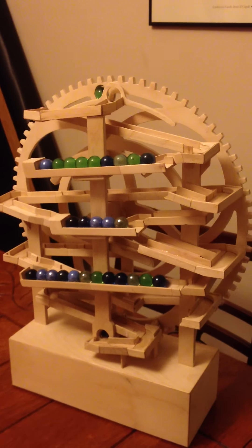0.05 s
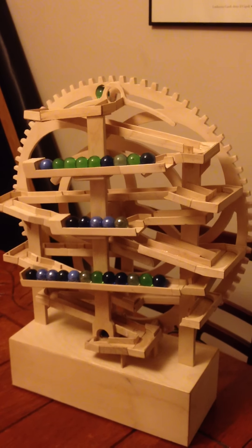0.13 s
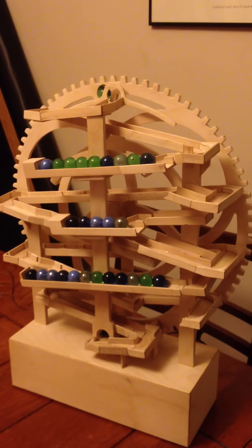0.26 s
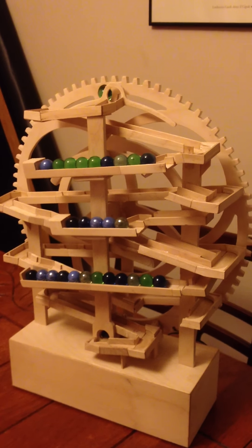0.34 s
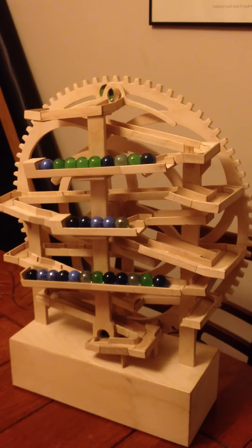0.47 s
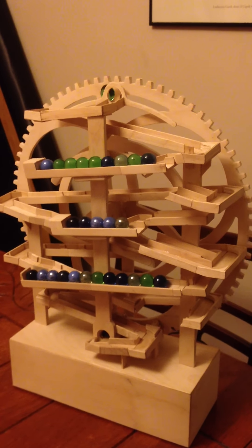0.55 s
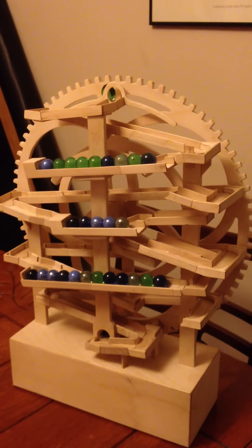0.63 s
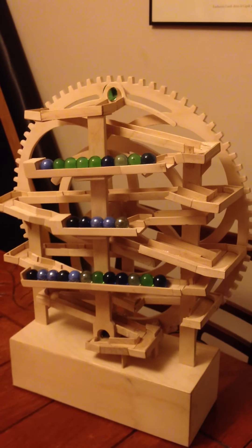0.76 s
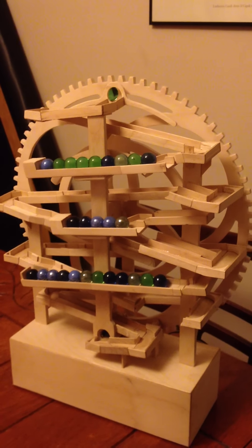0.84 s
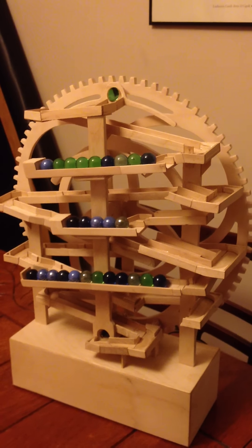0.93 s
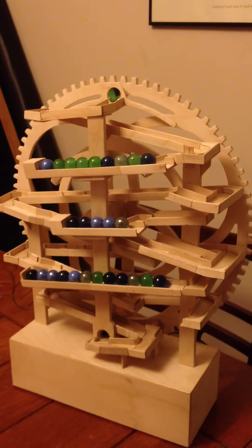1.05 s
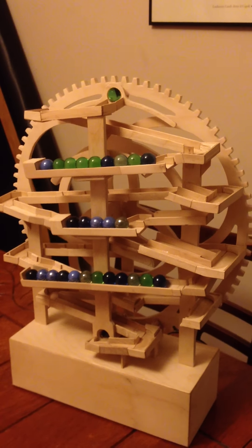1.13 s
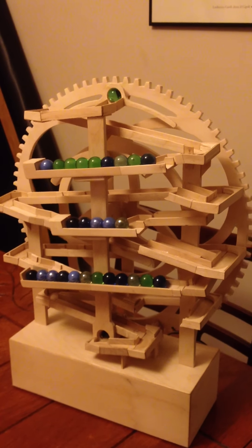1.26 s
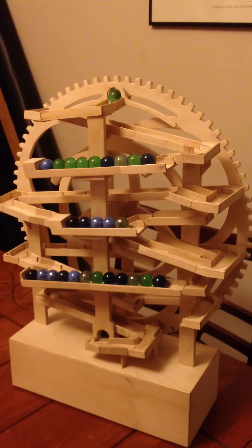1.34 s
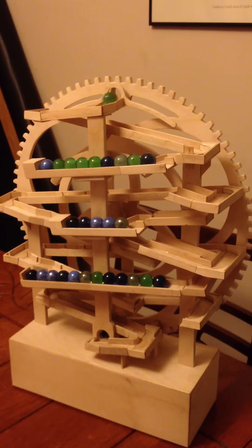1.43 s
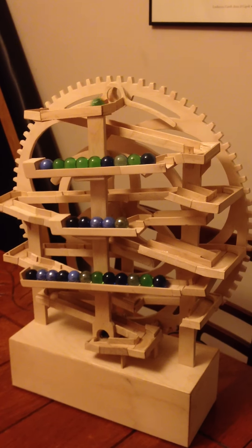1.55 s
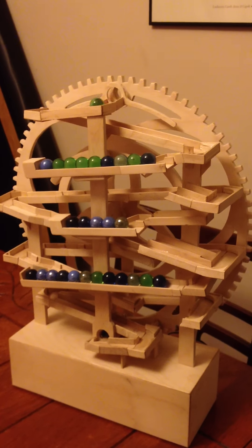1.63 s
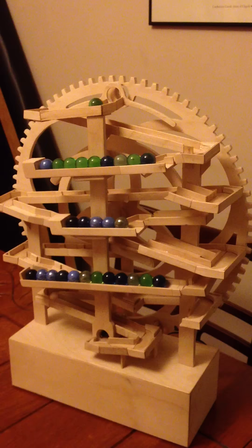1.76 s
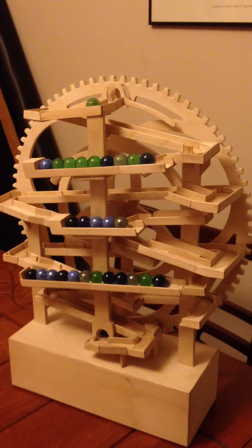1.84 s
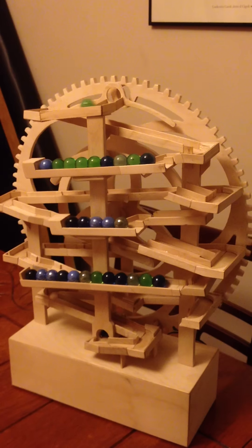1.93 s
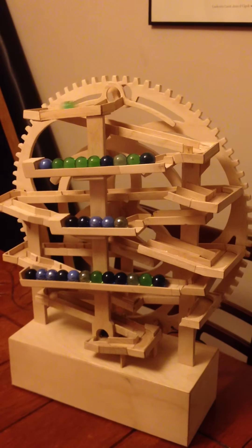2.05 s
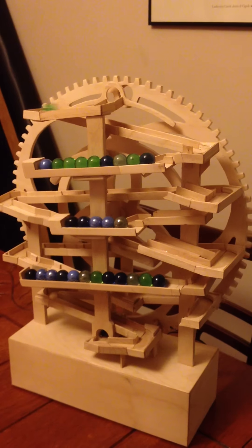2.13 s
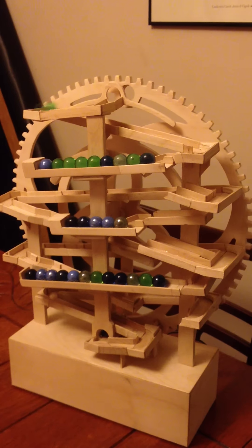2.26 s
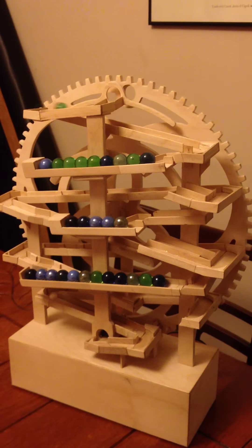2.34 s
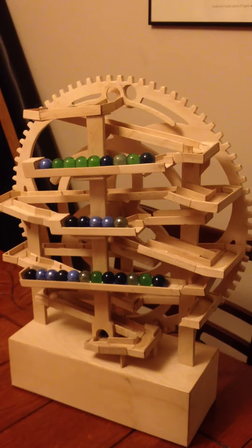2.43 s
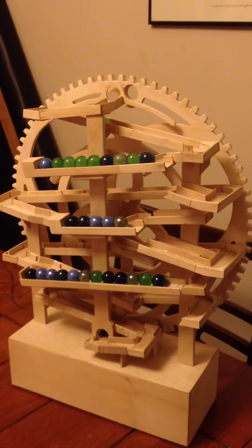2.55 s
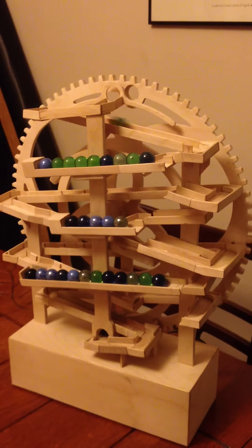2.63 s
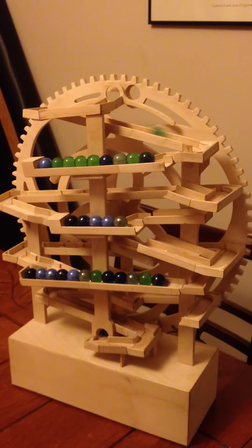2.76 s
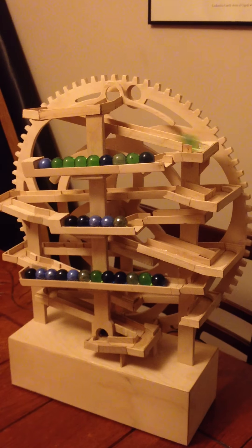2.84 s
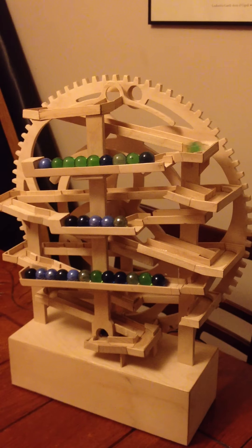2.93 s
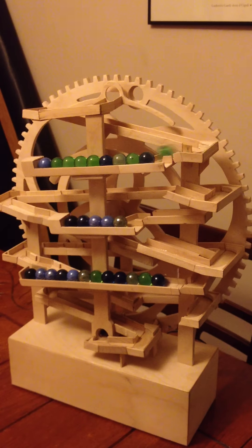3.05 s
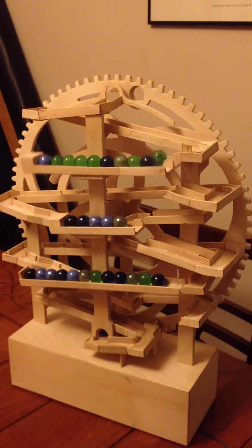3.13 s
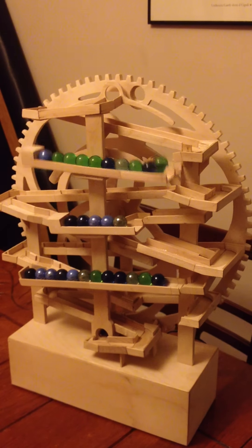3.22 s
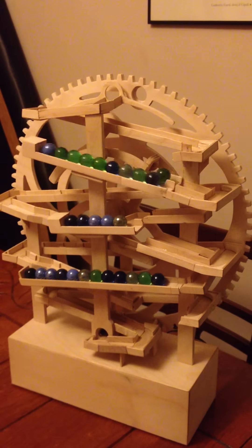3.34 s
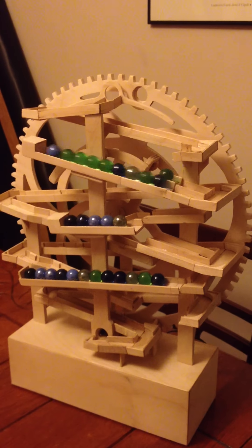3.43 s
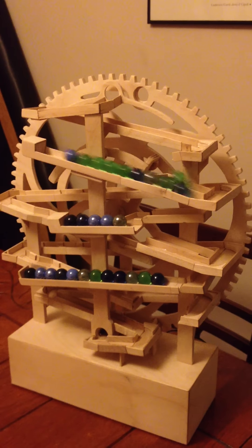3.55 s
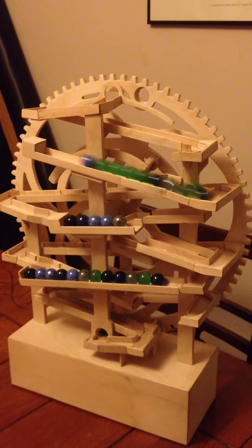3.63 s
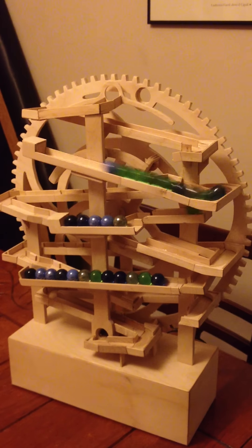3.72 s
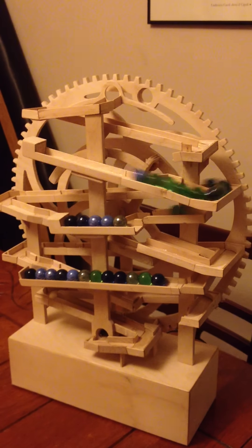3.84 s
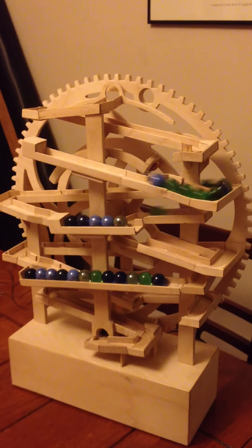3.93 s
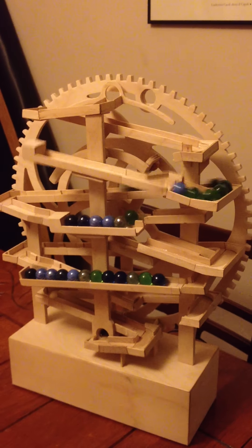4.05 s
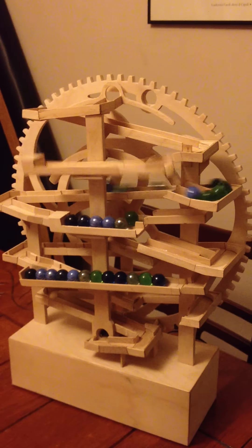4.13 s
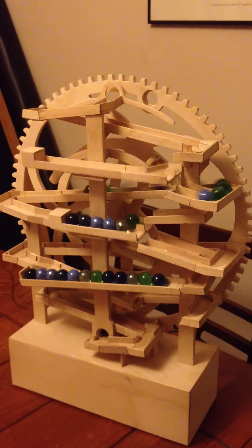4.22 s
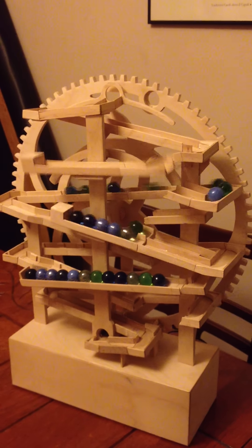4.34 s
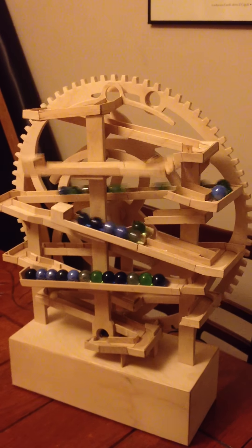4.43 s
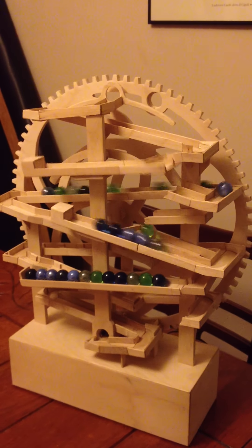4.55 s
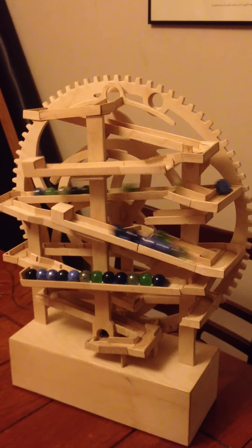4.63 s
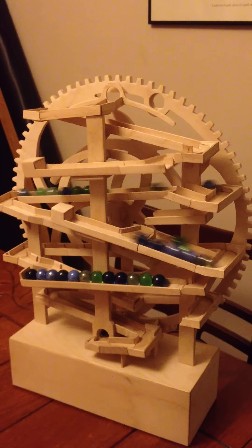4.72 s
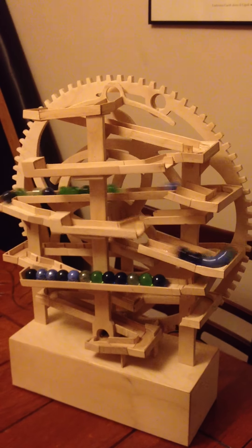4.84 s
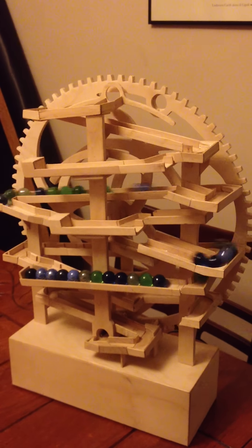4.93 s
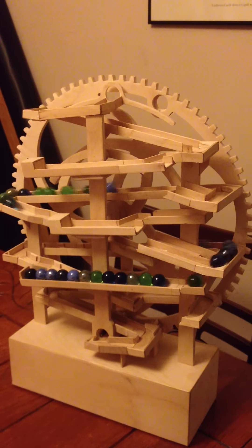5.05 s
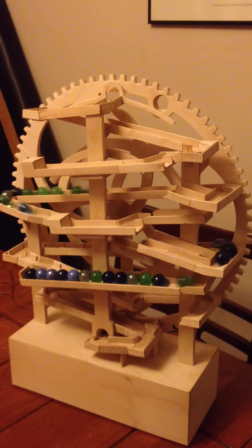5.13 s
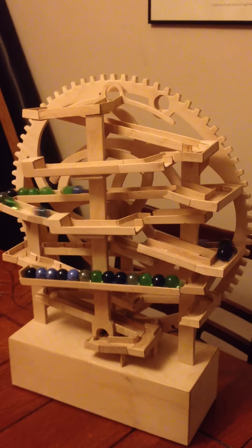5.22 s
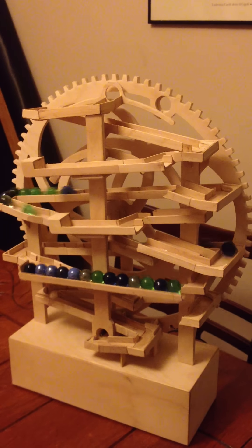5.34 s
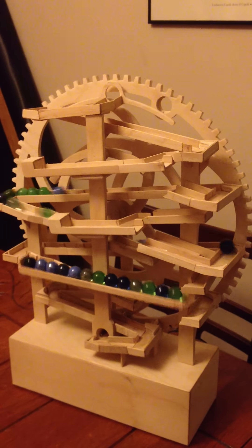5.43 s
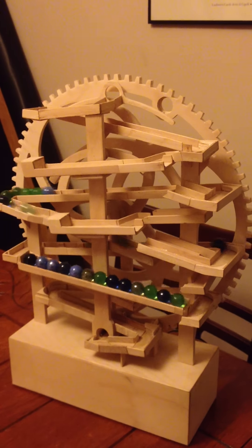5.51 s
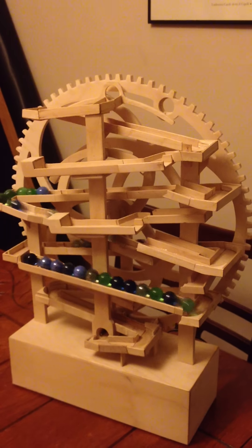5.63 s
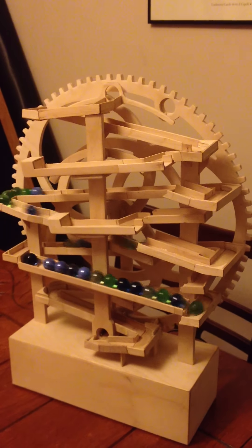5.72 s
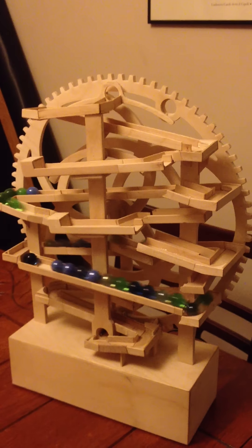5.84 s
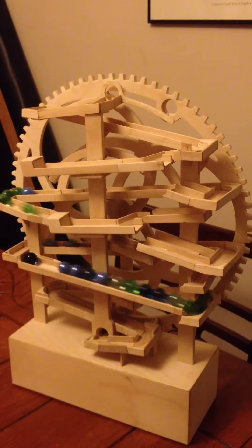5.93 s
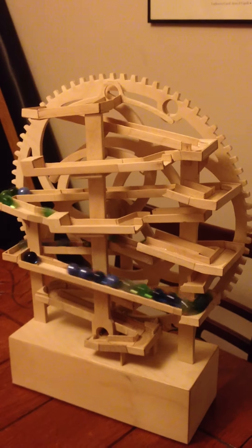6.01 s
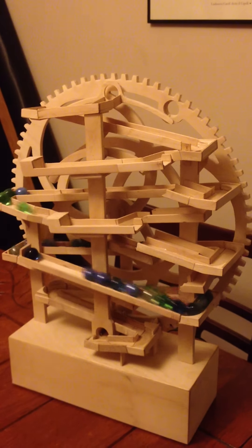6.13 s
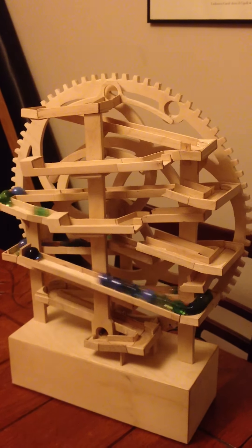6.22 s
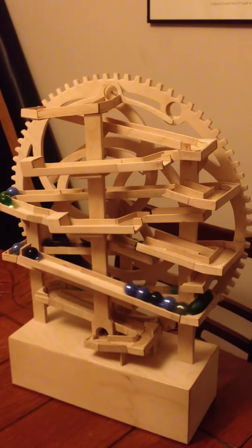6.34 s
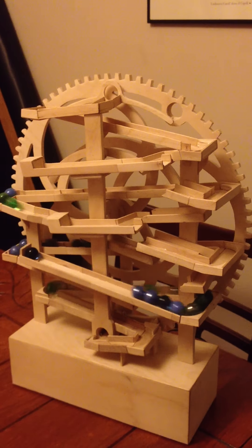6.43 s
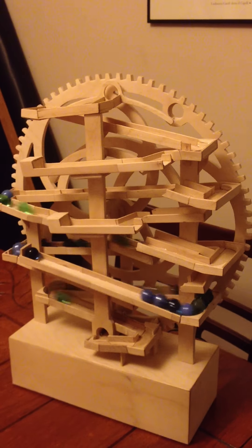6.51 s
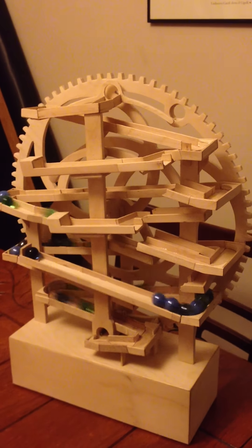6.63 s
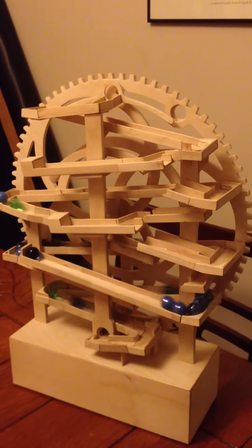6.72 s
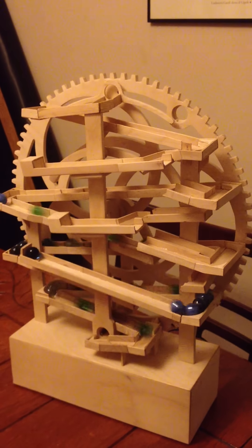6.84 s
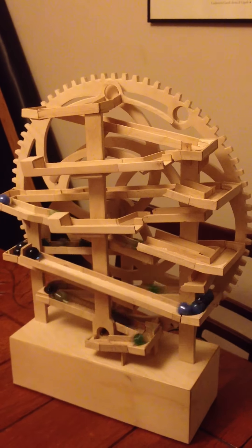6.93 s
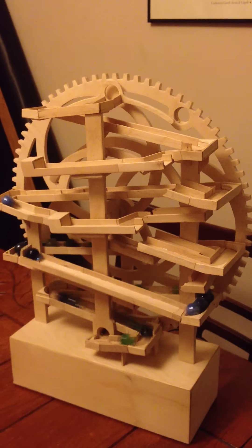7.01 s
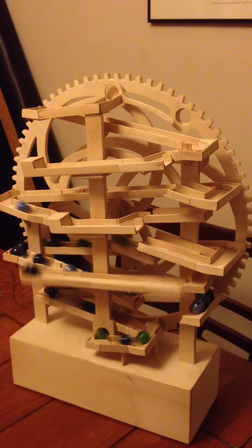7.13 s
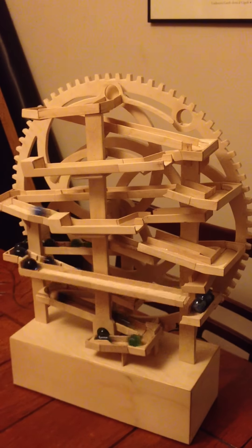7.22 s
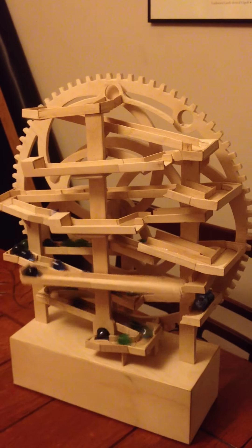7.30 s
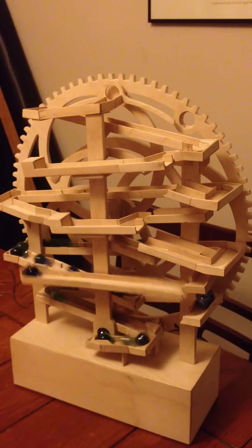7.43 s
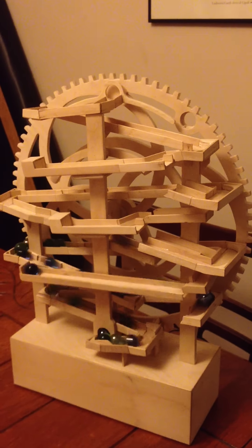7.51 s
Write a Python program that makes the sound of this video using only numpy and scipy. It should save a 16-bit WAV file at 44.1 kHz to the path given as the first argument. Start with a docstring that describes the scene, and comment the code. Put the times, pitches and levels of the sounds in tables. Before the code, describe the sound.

A close microphone in a small, fairly live room hears a soft steady hush. Around 0.8 to 1.3 seconds a wooden gear gives faint creaks, short trains of dull low pulses. From 1.3 a single glass marble stirs, with tiny taps and a clearer woody knock at 1.6, then a brief near-silence. It rolls again from about 2.05, clicking at 2.2 to 2.35 and 2.6 to 2.7, with sharper clacks near 3.0, 3.15 and 3.4. At 3.6 the trays tip and the sound swells abruptly, with very hard clacks around 3.7. A crowd of marbles then rumbles down hollow wooden tracks, jostling, cracking against thin rails and clinking brightly, with dull thuds in the frame and hollow base. Successive trayfuls surge and overlap, heavier thuds gathering after 6 seconds. The dense rattle continues to the end at about 7.5 seconds, without dying away.

```python
"""A wooden marble machine in a small, fairly live room, over a steady hush of filtered noise.
First the gear creaks in trains of dull pulses. Then a glass marble rolls and knocks down the tracks:
noise bursts for the cracks, damped sines for the wood's pitch, streams of tiny bumps for the rolling.
From 3.6 s the trays tip, and a crowd of marbles rumbles, clacks on wood and clinks brightly,
with random contacts for the jostling, until the end."""
import sys
import numpy as np
from scipy import signal
from scipy.fft import rfft, irfft
from scipy.io import wavfile

SR = 44100
rng = np.random.default_rng(int(sys.argv[2]) if len(sys.argv) > 2 else 0)


def wrap_up_sound(samples):
    """Save the sound to the file named by the first command line argument, as 16-bit audio."""
    columns = np.atleast_2d(samples).T
    # keep every value between -1 and 1, then stretch to whole-number steps
    tamed = np.clip(columns, -1, 1)
    steps = np.round(tamed * 32767).astype(np.int16)
    wavfile.write(sys.argv[1], SR, steps)


N = 333837
TIME = np.arange(N) / SR

# All levels in the tables are relative: each layer adds its own mix gain.

# A marble strikes a track end or drops onto a tray. Each row: time in seconds, clack level in dB,
# pitch of the wood in Hz, level of the thud in the frame in dB, hop until it lands again in seconds.
KNOCKS = [(1.3117, -57.5, 2890, -64, 0.0022), (1.3946, -58, 980, -66, 0.0034),
          (1.4437, -52, 1340, -63, 0.0062), (1.4616, -37.5, 1240, -52, 0.0043),
          (1.5951, -46, 1110, -55, 0.0054), (1.6153, -22.5, 1090, -37.5, 0.013),
          (1.6458, -26, 2480, -38, 0.015), (1.6719, -43, 2310, -41, 0.0082),
          (1.735, -31.5, 1450, -43.5, 0.0098), (2.152, -46.5, 1130, -72, 0.05),
          (2.2348, -33.5, 1640, -47.5, 0.0055), (2.2942, -26.5, 2810, -37.5, .0184),
          (2.3482, -35.5, 2820, -62, 0.0088), (2.6054, -49, 2470, -53, .012),
          (2.67, -40.5, 2480, -47, 0.0045), (2.6971, -32.5, 2780, -56, 0.0061),
          (2.9302, -21.5, 2650, -37, 0.0043), (2.9665, -35, 2510, -34, .01),
          (2.9914, -18, 2140, -38, 0.013), (3.1033, -32.5, 2520, -40, .012),
          (3.1331, -21.5, 2300, -41.5, 0.011), (3.1663, -29.5, 2630, -41, .005),
          (3.1922, -28, 3000, -47, .008), (3.3782, -29.5, 2580, -39, 0.0092),
          (3.3999, -21.5, 2890, -36, 0.011), (3.5924, -20.5, 3020, -46, .0235),
          (3.6509, -13.5, 2250, -33, 0.015), (3.692, -22.5, 2860, -42, 0.0083),
          (3.719, -12, 2850, -41, 0.0025), (3.761, -9, 2230, -28.5, 0.0018),
          (3.827, -19.5, 3020, -40, 0.0062), (3.9465, -20, 2650, -39, 0.0089),
          (4.0193, -23, 2700, -54, .003), (4.0982, -16.5, 2990, -52, .002),
          (4.2158, -18.5, 2680, -34.5, .013), (4.2704, -23, 2860, -40, 0.0045),
          (4.339, -22, 2440, -44, 0.0059), (4.3854, -17, 2620, -37, .016),
          (4.4515, -17.5, 2660, -50, 0.0035), (4.5285, -15, 2660, -32, 0.021),
          (4.636, -17.5, 2520, -37, .01), (4.6865, -12, 3080, -43, 0.01), (4.7598, -18, 2740, -40, .009),
          (4.885, -12, 1940, -32, .016), (4.9335, -10.5, 2960, -28.5, 0.0084), (5, -19, 2670, -37, 0.0076),
          (5.0591, -15.5, 2200, -34.5, .01), (5.135, -13.5, 2400, -35, 0.0039),
          (5.1681, -18.5, 2140, -30, 0.029), (5.242, -15, 2530, -37, 0.0076),
          (5.275, -26, 2660, -30.5, 0.013), (5.4156, -17.5, 2580, -29.5, .022),
          (5.5672, -15, 3020, -28, 0.0077), (5.5884, -16.5, 2540, -30.5, 0.0055),
          (5.631, -16, 2230, -29.5, 0.0097), (5.813, -16, 2400, -40, .01),
          (5.831, -14.5, 2270, -28.5, .012), (5.985, -10.5, 2200, -25, 0.012),
          (6.16, -12.5, 2150, -30.5, 0.0025), (6.2, -21, 2600, -30.5, 0.0059),
          (6.3915, -12, 2040, -32, 0.0082), (6.4711, -16.5, 2800, -30.5, 0.0087),
          (6.5127, -15.5, 2670, -39, .003), (6.5323, -12, 1750, -33, 0.0075),
          (6.6169, -10.5, 1800, -31, 0.016), (6.66, -11, 2600, -29.5, 0.018),
          (6.744, -12.5, 2330, -29, 0.0064), (6.8791, -15, 2100, -32.5, 0.0065),
          (6.9266, -15, 2750, -25.5, .008), (6.9678, -15, 2160, -38, 0.0063),
          (7.01, -13, 2170, -26, 0.0069), (7.1043, -13.5, 2890, -28.5, 0.0087),
          (7.1588, -13.5, 2230, -26.5, 0.007), (7.1972, -12, 2880, -31.5, 0.0072),
          (7.2533, -11.5, 2180, -27.5, 0.0071), (7.3, -13.5, 1670, -31, 0.0034),
          (7.3553, -13, 2610, -40, 0.018), (7.4178, -15.5, 2240, -27, 0.0052),
          (7.5478, -13.5, 2770, -29, 0.0037)]
# Bright glassy clinks, alone or on top of a wooden knock. Each row: time in seconds, level in dB.
CLINKS = [(1.6459, -47), (2.6975, -47.5), (3.1661, -38.5), (3.6512, -34), (3.762, -23), (4.1587, -33),
          (4.228, -28.5), (4.3059, -28.5), (4.339, -31), (4.3847, -30.5), (4.5051, -31.5), (4.5477, -33),
          (4.636, -28), (4.6862, -43), (4.7601, -29), (4.816, -33), (4.9006, -40), (4.9336, -27.5),
          (5.1934, -30.5), (5.276, -28), (5.437, -32.5), (5.5881, -28.5), (5.6313, -31), (5.757, -36),
          (5.8124, -27), (5.9848, -35), (6.199, -28), (6.276, -31.5), (6.3894, -29.5), (6.5323, -35),
          (6.8562, -30), (7.01, -31), (7.1036, -31.5), (7.4597, -33), (7.5342, -29)]
# How hard the crowd of marbles jostles once the trays tip. Each row: time in seconds, level in dB.
JOSTLE = [(3.6, -44), (3.66, -41), (3.76, -34), (3.82, -28.5), (4.15, -36.5), (4.43, -35.5), (4.62, -33.5),
          (4.88, -28.5), (5.1, -30.5), (5.25, -30.5), (5.38, -33.5), (5.78, -35), (6.33, -34), (6.63, -30),
          (6.95, -34), (7.15, -30), (7.57, -31.5)]
# A marble or a trayful runs down a track. Each row: start in seconds, end in seconds,
# level at full speed in dB, lean from the low to the high track note in dB.
RUNS = [(1.342, 1.503, -61, -13), (1.546, 1.746, -55, -12), (2.054, 2.367, -50.5, -9.5),
        (2.43, 2.727, -53, -3), (2.6, 2.895, -56.5, -14.5), (2.893, 3.012, -42.5, -15.5),
        (3.346, 3.433, -50, -4), (3.503, 3.786, -43, -6), (3.6, 4.144, -40, -2), (4.044, 4.424, -36, 2.5),
        (4.248, 4.977, -36, -3.5), (5.0, 5.298, -39, 7.5), (5.197, 5.848, -38.5, 2.5),
        (5.496, 6.415, -36.5, -0.5), (6.05, 6.75, -37, 6.5), (6.598, 7.037, -34, 3.5),
        (6.848, 7.452, -37.5, 13.5)]
# The gear sticks and slips on its axle. Each row: start in seconds, length in seconds,
# level at the middle of the creak in dB.
CREAKS = [(0.828, 0.084, -47), (0.957, .05, -53), (1.069, .004, -43.5), (1.258, .004, -49)]

# Resonances of the frame and its hollow base. Each row: centre in Hz, width in Hz, boost or cut in dB.
FRAME_MODES = [(122.6, 12, -1.5), (154.2, 2.8, 8), (187, 11.4, 7.5), (209, 5.7, 4.5), (325, 13, 5.5),
               (401, 24, 3.5), (461.7, 11, 8.5), (604.4, 4.8, 5.5), (655.5, 8.8, 7), (756, 91, 6.5),
               (938, 105, 5), (1030, 16, 6.5), (1357, 51, 6)]
# Bending modes of the thin rails. Each row: centre in Hz, width in Hz, boost or cut in dB.
RAIL_MODES = [(1134, 48, 8), (1560, 18, 7), (1637, 14, 3.5), (1760, 9, 3.3), (2163, 54, 1), (2560, 10, 7.5),
              (2770, 160, 0.5), (3330, 13, -0.5)]
# Hollow tone of the low and the high tracks under a rolling marble. Each row: centre in Hz, width in Hz.
TRACK_NOTES = [(412, 16.5), (467, 17.6)]

# Spectrum of glass cracking on wood. Each row: frequency in Hz, level in dB.
CLACK_SPECTRUM = [(60, -72), (300, -24), (900, -14.5), (1500, -4.5), (2200, 0.5), (2800, 3.5), (3250, 2),
                  (3800, -9), (4400, -21), (6000, -18.5), (8300, -35), (9800, -41), (15500, -74)]
# Spectrum of the bright, glassy clinks. Each row: frequency in Hz, level in dB.
CLINK_SPECTRUM = [(300, -59.5), (2500, 4.5), (4400, -15.5), (5400, -6), (6700, -1.5), (8200, -1.5),
                  (9000, -8.5), (9700, -22), (12000, -18.5), (15500, -27)]
# Spectrum of the hardest glass contacts. Each row: frequency in Hz, level in dB.
TICK_SPECTRUM = [(300, -60), (4400, -23), (6500, 17), (8300, -4), (9700, 1.5), (11500, 0.5), (15500, -6)]
# Spectrum of a blow's weight in the frame. Each row: frequency in Hz, level in dB.
THUD_SPECTRUM = [(40, -30), (85, -36), (125, -9), (185, -5.5), (350, 2), (480, 4), (570, -1.5),
                 (1100, -0.5), (1600, 2.5), (2600, 0), (4400, -22), (15000, -46)]
# Spectrum of the hollow base booming on. Each row: frequency in Hz, level in dB.
BOOM_SPECTRUM = [(40, -33), (80, -53), (110, -12.5), (200, 1.5), (290, -12.5), (450, -11), (2000, -75)]
# Spectrum of marbles rumbling on the rails. Each row: frequency in Hz, level in dB.
RUMBLE_SPECTRUM = [(40, -45), (85, -31), (125, -6.5), (185, -9.5), (350, 2), (500, 2.5), (570, -3.5),
                   (1200, -8.5), (2600, -5.5), (4400, -30.5), (7000, -18.5), (10000, -38), (15000, -63)]
# Spectrum of one slip of the gear. Each row: frequency in Hz, level in dB.
CREAK_SPECTRUM = [(60, -33), (130, -10), (260, 8), (480, 4), (750, 5), (1150, -9), (1500, -30), (5000, -48)]
# Spectrum of the quiet room and the microphone's hiss. Each row: frequency in Hz, level in dB.
HUSH_SPECTRUM = [(24, -63), (40, -16), (69, -32), (87, -24), (120, -2), (342, 0.5), (903, -9.5),
                 (1820, -8.5), (2060, -11), (2840, -6.5), (3930, -13.5), (6640, -13), (10100, -23),
                 (13300, -15), (15500, -14.5)]

# Blows within one stretch of time share a rail.
RAILS, STRETCH_S = 4, 0.22
# The second landing is weaker than the first.
HOP_LOSS_DB = 5.5
# Thin rails crack; thicker wood has a lower pitch, cracks less and rings more.
RAIL_HZ, PITCH_DB, CRACK_DB_PER_OCTAVE = 2640, 1, 4.5
# A knock excites the glass too: offset in dB, and dB gained per dB of crack.
GLASS_DB, GLASS_GROWTH = -24.5, 0.92
# What the jostling gives to the rails, the glass and the frame.
JOSTLE_WOOD_DB, JOSTLE_GLASS_DB, JOSTLE_FRAME_DB = -1, -2.5, -5.5
SHOVES_PER_S, SHOVE_SPREAD_DB = 30, 3.5
# Decay time constant once the marbles leave the track.
RUN_OUT_S = 0.038
# Typical gap between slips, its unevenness (log scale), and how much weaker the ends of a creak are.
SLIP_GAP_S, SLIP_JITTER, SLIP_EDGE_DB = 0.011, 0.25, 5.5
HUSH_DB = -69
CUTOFF_HZ = 15500


def hopping():
    """Every knock and the weaker landing that follows it: times, clack levels, pitches, thud levels."""
    times, clack_db, pitch_hz, thud_db, hop_s = np.transpose(KNOCKS)
    all_times = np.r_[times, times + hop_s]
    all_clack_db = np.r_[clack_db, clack_db - HOP_LOSS_DB]
    all_thud_db = np.r_[thud_db, thud_db - HOP_LOSS_DB]
    return all_times, all_clack_db, np.r_[pitch_hz, pitch_hz], all_thud_db


def clacks(times, db, pitch_hz, pitch_db):
    """Glass on wood: a crack that chatters once more as the marble settles, plus the pitch of the wood."""
    settle_times = times + rng.uniform(0.00191, 0.009, len(times))
    contacts = strikes(times, db + 13) + strikes(settle_times, db + 9.5)
    crack = colour(ring_out(contacts, ring_t60=0.032, room_t60=0.44, room_db=-3.5), CLACK_SPECTRUM)
    ping_sizes = from_db(db + pitch_db + 8.5)
    return crack + pings(times, ping_sizes, pitch_hz, ring_t60=0.011, room_db=-3)


def pings(times, sizes, pitch_hz, ring_t60, room_db):
    """The piece of wood that is hit swings at its own pitch and dies away; the room answers."""
    t = TIME[:SR // 20]
    envelope = (1 - np.exp(-t / 0.0005)) * from_db(-60 * t / ring_t60)
    out = np.zeros((RAILS, N + len(t)))
    for rail, s, size, hz in zip(rail_at(times), times, sizes, pitch_hz):
        start = min(round(s * SR), N - 1)
        swing = unit(envelope * np.sin(2 * np.pi * hz * t))
        out[rail, start:start + len(t)] += size * swing
    direct = out.sum(axis=0)[:N]
    return direct + from_db(room_db) * heard(out, reflections(0.27))


def clinks(times, db, jostle):
    """Glassy contacts: bright clinks that mostly come back from the room, and hard, drier ticks."""
    blows = strikes(times, db + 26.5)
    contacts = blows + from_db(-5.5) * jostle * patter(per_s=90, spread_db=6.5)
    hardest = from_db(-10.5) * blows + from_db(-14) * jostle * patter(per_s=70, spread_db=4)
    clink = colour(ring_out(contacts, ring_t60=0.02, room_t60=0.32, room_db=2.5), CLINK_SPECTRUM)
    tick = colour(ring_out(hardest, ring_t60=0.008, room_t60=0.2, room_db=-1.5), TICK_SPECTRUM)
    return clink + tick


def thuds(times, db):
    """The weight of each blow goes into the frame; the hollow base swells more slowly and booms on."""
    blows = strikes(times, db + 25.5)
    thud = colour(ring_out(blows, ring_t60=0.046, room_t60=0.36, room_db=6.5), THUD_SPECTRUM)
    boom = colour(ring_out(blows, ring_t60=0.13, room_t60=0.68, room_db=12), BOOM_SPECTRUM)
    return thud + from_db(-14) * boom


def crowd_level():
    """Gain of the jostling over time, silent until the trays tip."""
    s, db = np.transpose(JOSTLE)
    return from_db(np.interp(TIME, s, db)) * (TIME >= s[0])


def jostling(level):
    """Crowded marbles bump the rails at random, each bump with its own pitch of wood."""
    contacts = level * patter(per_s=260, spread_db=3)
    sizes = contacts.sum(axis=0)
    at = np.flatnonzero(sizes)
    pitch_hz = rng.triangular(1400, 2800, 3400, len(at))
    crack = colour(ring_out(contacts, ring_t60=0.039, room_t60=0.25, room_db=-10), CLACK_SPECTRUM)
    ping = pings(at / SR, sizes[at], pitch_hz, ring_t60=0.036, room_db=-9)
    return from_db(-2) * crack + from_db(-9) * ping


def shoves(level):
    """At random moments the crowd bumps the frame: times and strengths in dB."""
    at = np.flatnonzero((rng.random(N) < SHOVES_PER_S / SR) & (level > 0))
    uneven_db = SHOVE_SPREAD_DB * rng.standard_normal(len(at))
    return at / SR, 20 * np.log10(level[at]) + JOSTLE_FRAME_DB + uneven_db


def rolling():
    """Marbles run over the grain in a stream of tiny bumps; each hollow track hums at its own note."""
    levels = run_levels()
    hum = 0
    for level, (hz, width_hz) in zip(levels, TRACK_NOTES):
        grain = patter(per_s=900, spread_db=1).sum(axis=0)
        note = mode(mode(grain, hz, width_hz), hz, 4 * width_hz)
        hum = hum + level * np.sqrt(N) * unit(note)  # note at a mean power of one
    bumps = from_db(-9) * sum(levels) * patter(per_s=900, spread_db=6)
    rumble = colour(ring_out(bumps, ring_t60=0.03, room_t60=0.59, room_db=-2.5), RUMBLE_SPECTRUM)
    return from_db(-5) * hum + resonate(resonate(rumble, FRAME_MODES), RAIL_MODES)


def run_levels():
    """Gains of the low and high tracks: speed, and loudness with it, grows evenly along each run."""
    power = np.zeros((2, N))
    for start, end, db, lean_db in RUNS:
        speed = np.clip((TIME - start) / (end - start), 0, 1)
        run_out = np.exp(-np.maximum(TIME - end, 0) / RUN_OUT_S)
        lean = from_db([[-lean_db / 2], [lean_db / 2]])
        power += (lean * from_db(db) * speed * run_out) ** 2
    return np.sqrt(power)


def gear_creak():
    """Each stick-slip of the gear is one dull pulse with a short ring and room answer."""
    times, db = slips()
    pulses = strikes(times, db + 13)
    echo = ring_out(pulses, ring_t60=0.015, room_t60=0.24, room_db=0)
    return colour(pulses.sum(axis=0) + from_db(-4) * echo, CREAK_SPECTRUM)


def slips():
    """Tension builds and eases over an uneven train of slips: times and strengths in dB."""
    rows = []
    for start, length, db in CREAKS:
        gaps = SLIP_GAP_S * np.exp(SLIP_JITTER * rng.standard_normal(32))
        delays = np.r_[0, np.cumsum(gaps)]
        for s in delays[delays <= length]:
            from_middle = 2 * s / length - 1
            rows.append((start + s, db - SLIP_EDGE_DB * from_middle ** 2))
    return np.transpose(rows)


def room_hush():
    """The quiet room and the microphone's hiss: steady filtered noise."""
    return from_db(HUSH_DB) * colour(rng.standard_normal(N), HUSH_SPECTRUM)


def strikes(times, db):
    """One impulse for each blow, on its rail."""
    out = np.zeros((RAILS, N))
    at = np.clip(np.round(times * SR).astype(int), 0, N - 1)
    np.add.at(out, (rail_at(times), at), from_db(db) * (times < N / SR))
    return out


def patter(per_s, spread_db):
    """Small contacts of uneven strength at random moments on random rails; mean power one in all."""
    born = rng.random(N) < per_s / SR
    sizes = born * from_db(spread_db * np.clip(rng.standard_normal(N), -2, 2))
    out = np.zeros((RAILS, N))
    out[rng.integers(0, RAILS, N), np.arange(N)] = unit(sizes) * np.sqrt(N)
    return out


def rail_at(times):
    """Blows in the same stretch of time fall on the same rail."""
    return (times // STRETCH_S).astype(int) % RAILS


def ring_out(contacts, ring_t60, room_t60, room_db):
    """A blow spreads through its rail, rings as a dense decaying noise, and the room answers."""
    room = reflections(room_t60)
    t = TIME[:room.shape[1]]
    spread = 1 - np.exp(-t / (0.012 * ring_t60))
    ring = unit(rng.standard_normal(room.shape) * spread * from_db(-60 * t / ring_t60))
    return heard(contacts, unit(ring + from_db(room_db) * room))


def reflections(t60):
    """The room's answer from each rail: a dense tail that builds up and dies away."""
    t = TIME[:SR * 2 // 3]
    build_up = 1 - np.exp(-t / 0.0039)
    return unit(rng.standard_normal((RAILS, len(t))) * build_up * from_db(-60 * t / t60))


def heard(contacts, responses):
    """The contacts on each rail through that rail's response, summed at the microphone."""
    return signal.fftconvolve(contacts, responses, axes=1).sum(axis=0)[:N]


def resonate(x, modes):
    """A wooden body boosts or cuts whatever shakes it at each of its resonances."""
    return x + sum((from_db(lift_db) - 1) * mode(x, hz, width_hz) for hz, width_hz, lift_db in modes)


def mode(x, hz, width_hz):
    """One two-pole resonance with a gain of about one at its top."""
    r = np.exp(-np.pi * width_hz / SR)
    poles = [1, -2 * r * np.cos(2 * np.pi * hz / SR), r * r]
    return (1 - r * r) / 2 * signal.lfilter([1, 0, -1], poles, x + 1e-18)


def colour(x, spectrum, size=4096):
    """Causal (minimum-phase) filter with the given spectrum shape and unit energy."""
    hz, db = np.transpose(spectrum)
    grid = np.maximum(np.arange(size // 2 + 1) * SR / size, 1)
    magnitude = from_db(np.interp(np.log(grid), np.log(hz), db))
    cepstrum = irfft(np.log(magnitude))
    # Folding the cepstrum onto positive time gives minimum phase.
    cepstrum[1:size // 2] *= 2
    cepstrum[size // 2 + 1:] = 0
    impulse = irfft(np.exp(rfft(cepstrum)))
    return signal.oaconvolve(x, unit(impulse))[:N]


def from_db(db):
    """Decibels to gain."""
    return 10 ** (np.asarray(db) / 20)


def unit(x):
    """Scaled to an energy of one along the last axis."""
    return x / np.sqrt(np.sum(x ** 2, axis=-1, keepdims=True) + 1e-20)


def scene():
    """Blows, jostling and rolling on one wooden frame, with the gear's creak, over the hush of the room."""
    times, db, pitch_hz, thud_db = hopping()
    crack_db = CRACK_DB_PER_OCTAVE * np.log2(pitch_hz / RAIL_HZ)
    crowd = crowd_level()

    knocks = clacks(times, db + crack_db, pitch_hz, PITCH_DB - crack_db)
    rails = resonate(knocks + jostling(from_db(JOSTLE_WOOD_DB) * crowd), RAIL_MODES)

    clink_times, clink_db = np.transpose(CLINKS)
    glass_db = GLASS_DB + GLASS_GROWTH * (db + crack_db)
    glass_times = np.r_[times, clink_times]
    glass = clinks(glass_times, np.r_[glass_db, clink_db], from_db(JOSTLE_GLASS_DB) * crowd)

    shove_times, shove_db = shoves(crowd)
    blows = thuds(np.r_[times, shove_times], np.r_[thud_db, shove_db])
    frame = resonate(blows, FRAME_MODES)
    return (rails + glass + frame + rolling() + gear_creak() + room_hush())[None]


def record(dry):
    """A steep elliptic low-pass cuts the top: 0.3 dB ripple, 70 dB down beyond the edge."""
    return signal.sosfilt(signal.ellip(10, 0.3, 70, CUTOFF_HZ, fs=SR, output="sos"), dry)


dry = scene()
out = record(dry)
wrap_up_sound(out)
```